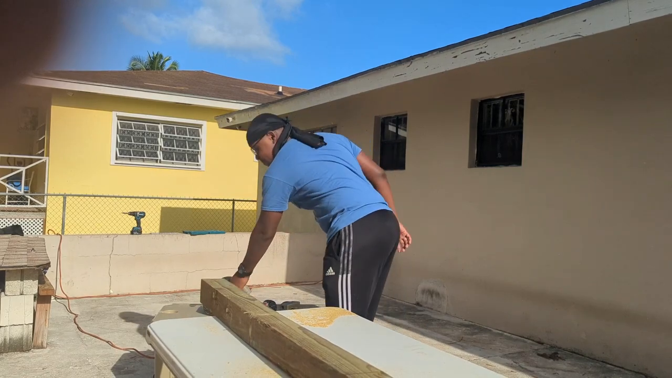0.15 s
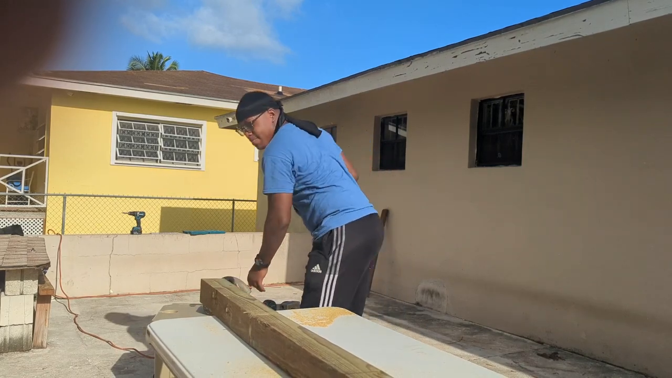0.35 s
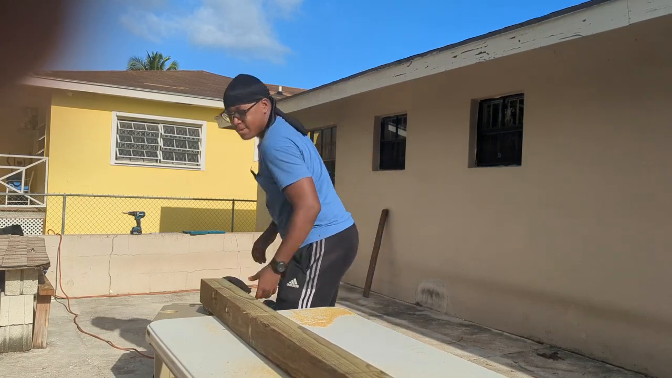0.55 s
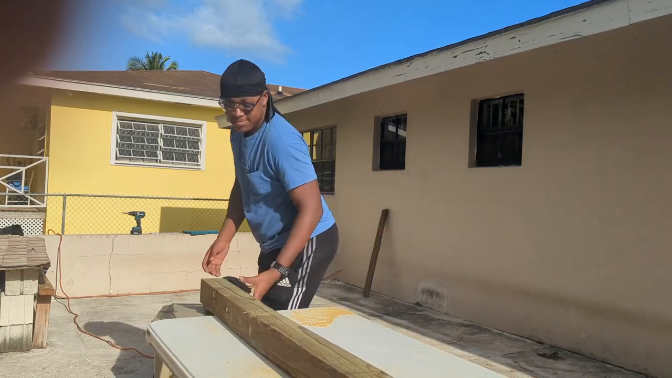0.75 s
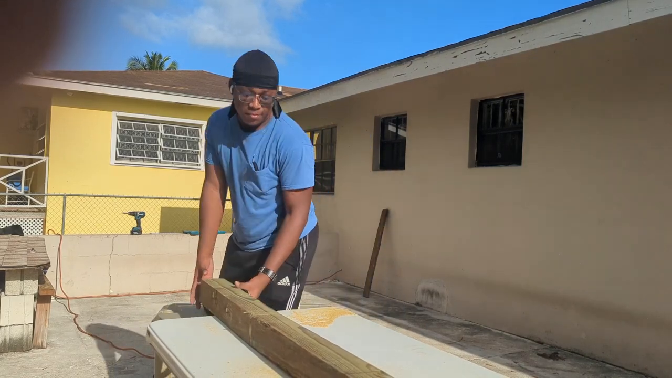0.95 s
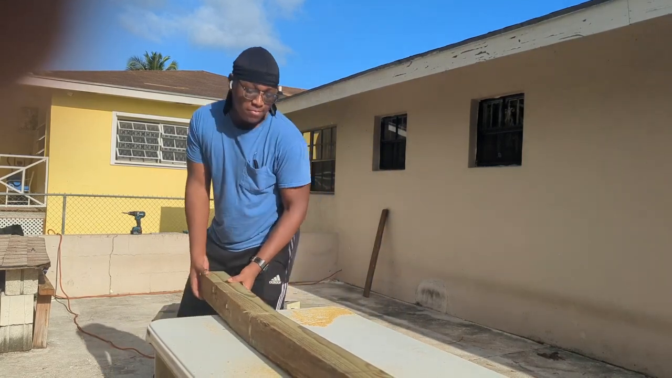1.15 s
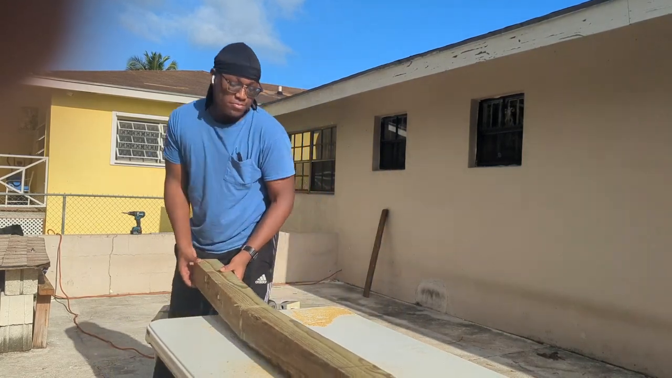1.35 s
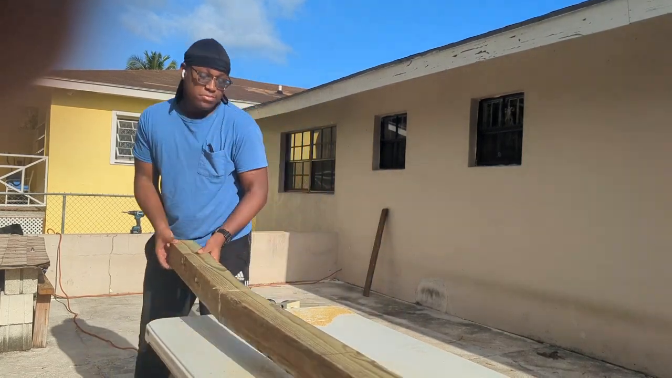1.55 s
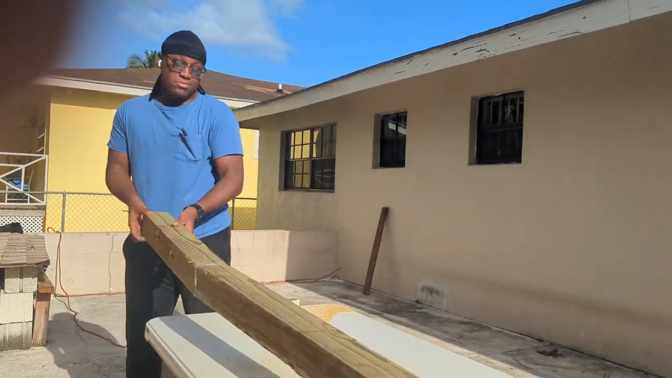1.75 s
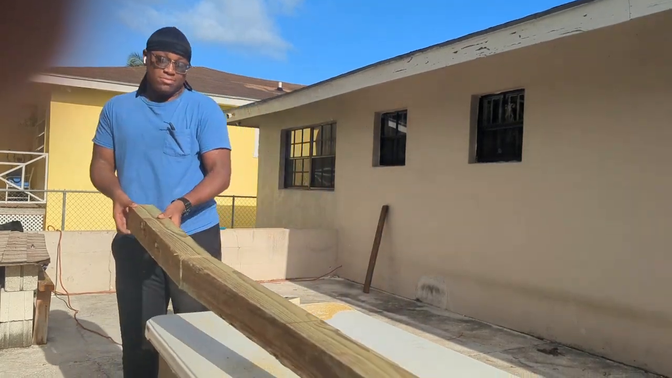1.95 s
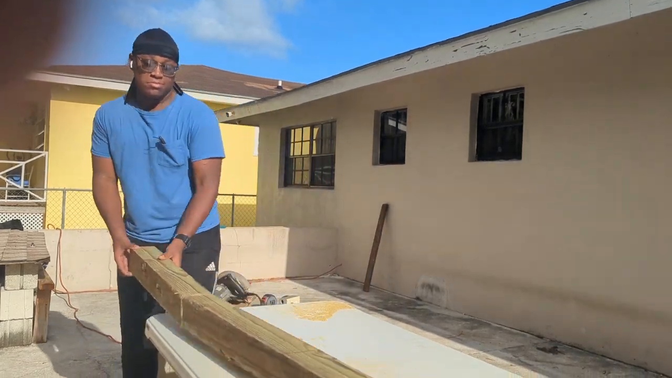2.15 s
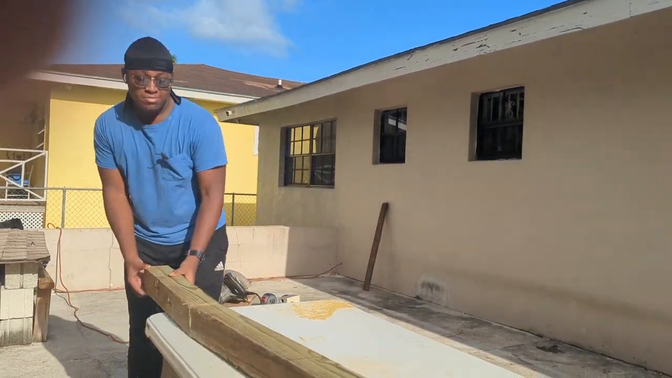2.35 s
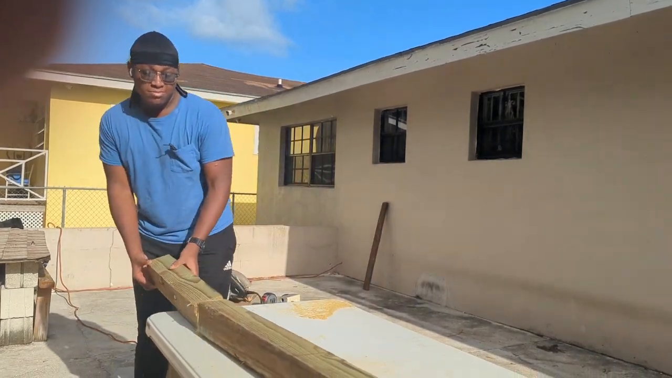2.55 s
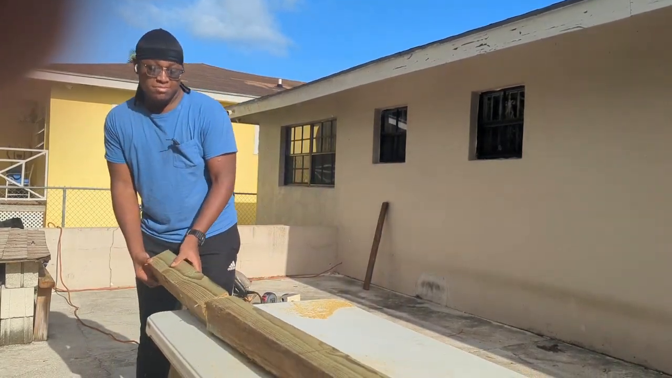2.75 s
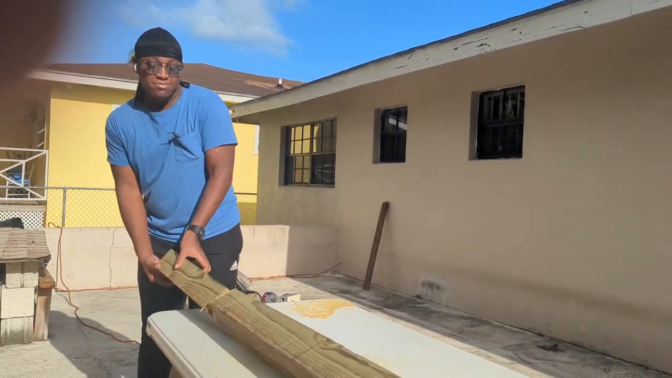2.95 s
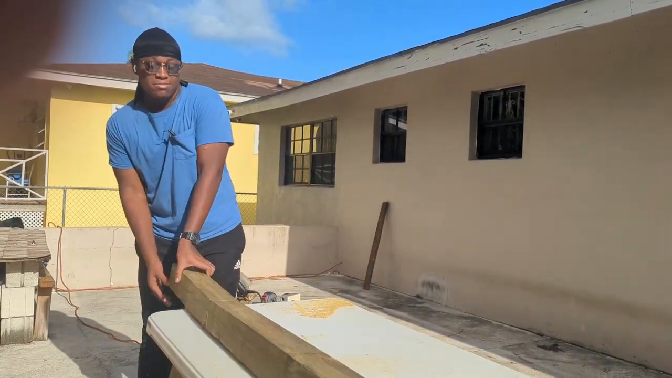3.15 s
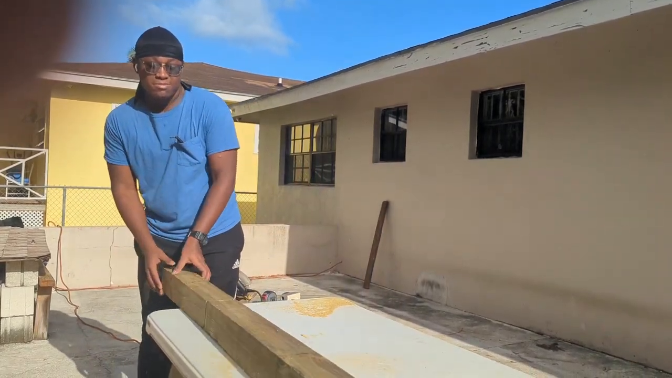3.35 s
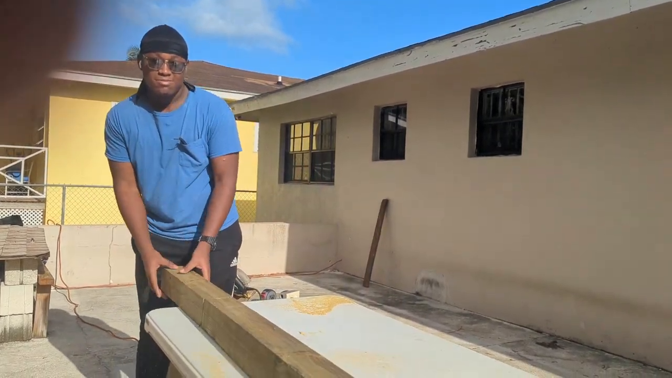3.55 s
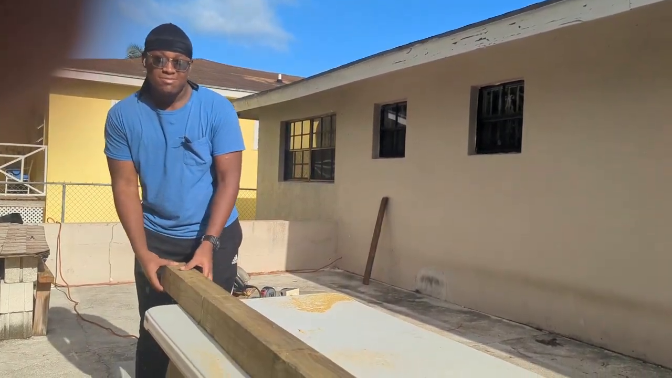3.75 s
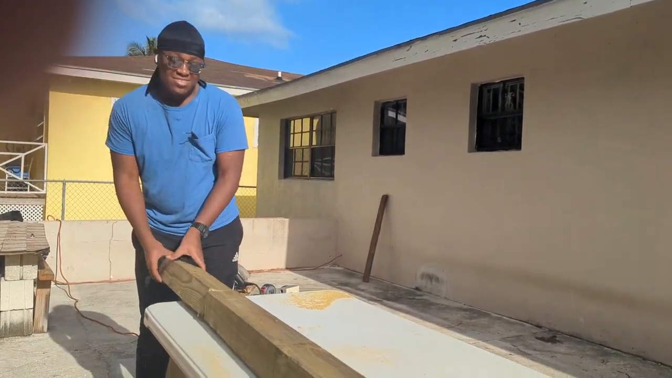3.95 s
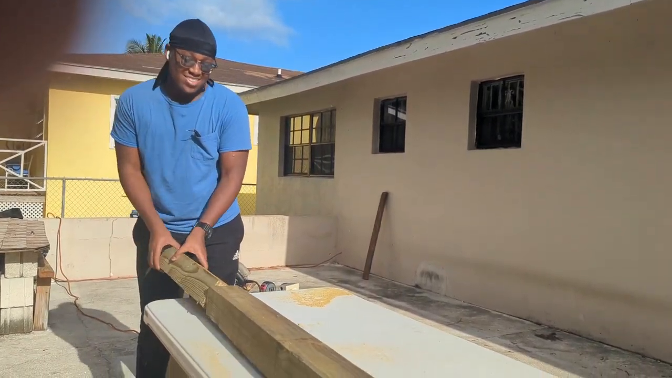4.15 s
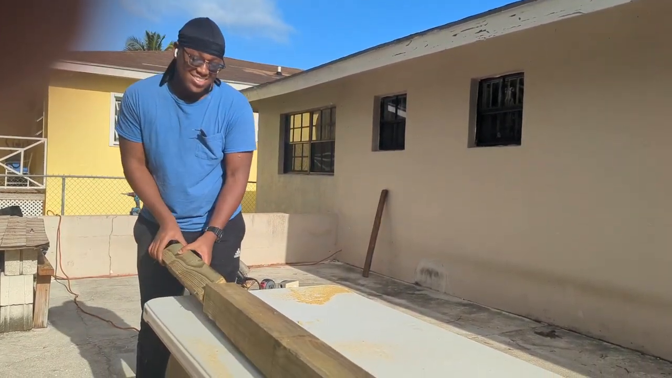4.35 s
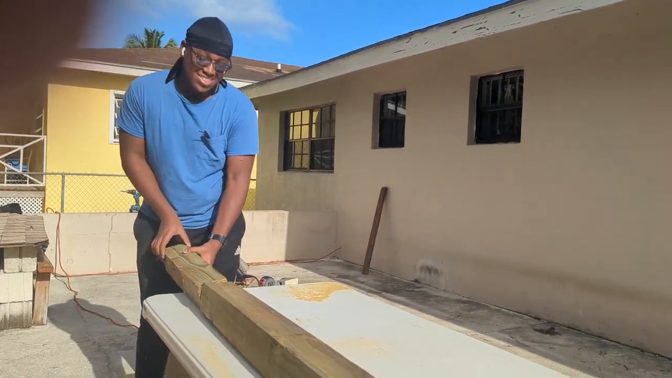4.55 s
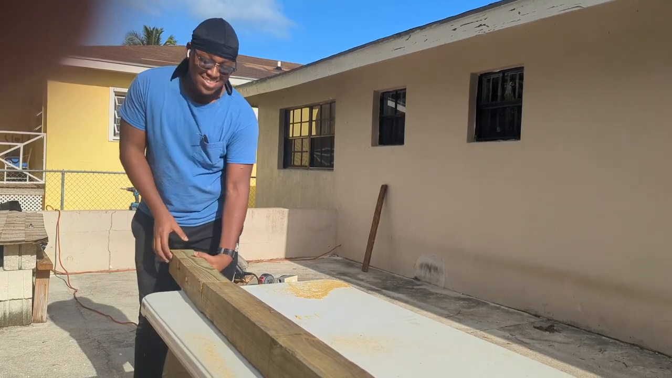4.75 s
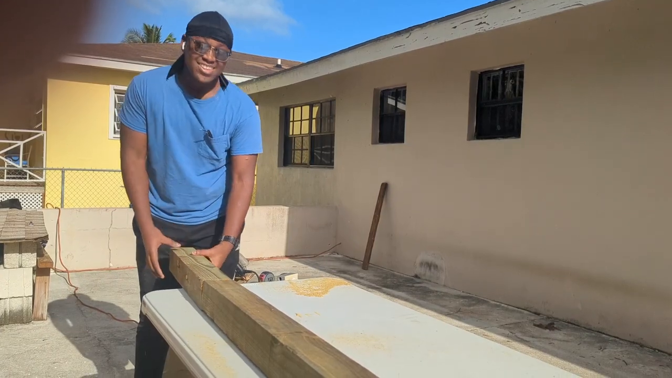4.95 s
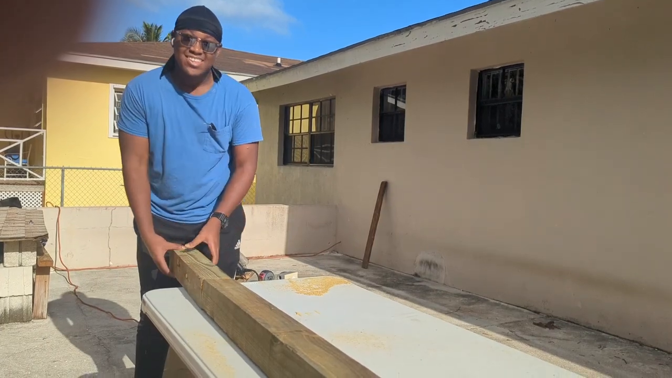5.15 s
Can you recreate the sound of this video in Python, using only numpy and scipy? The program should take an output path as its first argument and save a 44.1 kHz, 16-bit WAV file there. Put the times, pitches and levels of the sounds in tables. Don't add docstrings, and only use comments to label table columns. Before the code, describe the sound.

Outdoors, a thick beam is rolled and dropped on a hollow table, with light hand rubs and knocks between and one very hard bang.

```python
import sys
import numpy as np
from scipy import signal
from scipy.fft import rfft, irfft, next_fast_len
from scipy.io import wavfile
from scipy.ndimage import uniform_filter1d, map_coordinates

SR = 44100
rng = np.random.default_rng(int(sys.argv[2]) if len(sys.argv) > 2 else 0)


def persist_wave(psi):
    counts = np.round(np.clip(psi, -1, 1) * 32767).astype(np.int16)
    wavfile.write(sys.argv[1], SR, np.atleast_2d(counts).T)


def ratio(d):
    e = np.asarray(d, float) / 20
    return 10 ** e


N = 233405
RATTLE_DB, FLAT_DULLS = -16, 0.1


def unit(x):
    return x / np.sqrt(np.mean(x ** 2) + 1e-20)


def along(points, hz):
    f, v = np.transpose(points)
    return np.interp(np.log(hz + 1), np.log(f + 1), v)


def curves(rows, outside_db=None):
    s, *cols = np.transpose(rows)
    return np.array([np.interp(np.arange(N) / SR, s, c, outside_db, outside_db) for c in cols])


def wobble(rate):
    knots = rng.standard_normal(int(N * rate / SR) + 4)
    return map_coordinates(knots, [np.arange(N) * rate / SR])


def filtered(x, response):
    m = next_fast_len(N + SR // 2)
    return irfft(rfft(x, m) * response(np.fft.rfftfreq(m, 1 / SR)), m)[..., :N]


def body(modes):
    def response(f):
        total = 0
        for k, (hz, width, db) in enumerate(modes):
            peak = 1j * f * width / (hz * hz - f * f + 1j * f * width)
            total = total + (-1) ** k * ratio(db) * peak
        return total
    return response


def patchy(x, depth_db, size):
    z = signal.stft(x, nperseg=256)[2]
    field = rng.standard_normal(z.shape[-2:])
    field = uniform_filter1d(field, size[0], 0)
    field = uniform_filter1d(field, size[1], 1)
    return signal.istft(z * ratio(depth_db * unit(field)), nperseg=256)[1][..., :N]


def town():
    # (frequency [Hz], level per Hz [dB])
    town_colour = [(20, 1), (50, 0.5), (70, -4), (140, -3.5), (250, -10.5), (400, -15.5), (550, -19.5),
                   (1000, -21.5), (2000, -27), (2800, -36), (4100, -37.5), (6000, -50.5), (11000, -56),
                   (15700, -67)]
    noise = patchy(rng.standard_normal((2, N)), 1.0, size=(3, 28))
    level_db = -51 + 0.1747 * np.arange(N) / SR
    hiss = unit(filtered(noise, lambda hz: ratio(along(town_colour, hz))))
    return ratio(level_db + 9.0 + 0.8 * wobble(3.38)) * hiss


def drone():
    # (pitch [Hz], width [Hz], level [dB])
    hum_bands = [(81, 10, -42), (118, 16, -49), (190, 34, -50)]
    # (time [s], level [dB])
    load = [(0, -38.5), (.6, -41), (1.2, -42), (1.5, -42), (1.83, -44), (2.06, -39), (2.17, -44.5),
            (2.4, -37.5), (2.98, -42), (3.25, -35), (3.75, -38.5), (3.9, -43.5), (4.49, -40), (4.67, -40),
            (4.94, -36), (5.29, -42.5)]

    def muffled(hz):
        return body(hum_bands)(hz) / (1 + (hz / 500) ** 2)

    hum = unit(filtered(rng.standard_normal(N), muffled))
    return ratio(curves(load)[0] - 1.5 + 0.58 * wobble(2.4)) * hum


def whine():
    # (pitch [Hz], level [dB])
    machine_tones = [(81.5, -43.5), (551, -79), (916, -67), (1282, -87), (1562, -69), (11633, -100.5),
                     (12000, -97)]
    t = np.arange(N) / SR
    out = np.zeros(N)
    for hz, db in machine_tones:
        strength = ratio(db + 1.6 * wobble(1.49))
        out += strength * np.sin(2 * np.pi * hz * t + 0.46 * wobble(1.99))
    return out


def chatter_db():
    # (time [s], force [dB])
    drags = [
        [(0, -24), (.022, -37), (.06, -32), (.075, -32.5), (.09, -37)],
        [(.09, -37.5), (.112, -28.5), (.134, -32), (.168, -42), (.21, -54)],
        [(2.343, -33), (2.349, -30.5), (2.365, -35.5), (2.395, -36), (2.41, -32.5)],
        [(2.41, -34), (2.421, -28.5), (2.431, -27), (2.453, -32.5), (2.53, -66), (2.55, -69)],
        [(3.289, -22.5), (3.302, -19.5), (3.345, -14), (3.374, -22), (3.414, -23), (3.452, -25.5),
         (3.462, -24.5), (3.525, -29), (3.56, -41)],
        [(3.56, -44.5), (3.592, -37.5), (3.612, -40.5), (3.63, -70), (3.65, -74)],
    ]
    # (table top [dB], legs [dB])
    shares = [(6, -15.5), (5, -25), (8, -8.5), (3, -4), (3, -8.5), (2, -6.5)]
    grows = np.array([[1], [1], [1.08]])
    firm_db = -23
    each = []
    for rows, (top_db, legs_db) in zip(drags, shares):
        force_db = curves(rows, outside_db=-400)
        each.append(firm_db + grows * (force_db - firm_db) + [[top_db], [0], [legs_db]])
    return np.max(each, axis=0)


def chatter_slips():
    slipping = rng.random((3, N)) < 3000 / SR
    grains = slipping * rng.standard_normal((3, N)) * ratio(1.5 * rng.exponential(size=(3, N)))
    clumps_each = np.array([wobble(40), wobble(90), wobble(150)])
    grains *= ratio(1.7 * wobble(60) + 1.8 * clumps_each)
    return patchy(grains, 3.3, size=(2, 4))


def single_blows():
    # (time [s], wood peak [dB], flatness: table top over wood [dB])
    landings = [(0.003, -28.5, 24), (0.031, -23, 13), (0.055, -30, 20), (0.083, -28, 2), (0.117, -20, -9),
                (2.342, -26, -9), (2.347, -15.5, 10), (2.359, -25, -10), (2.428, -13, -8),
                (2.449, -15.5, -4), (3.29, -8, 2), (3.299, -3, -5), (3.31, 2.5, -20), (3.32, -8, -16),
                (3.333, -15, -18), (3.346, -9, -11), (3.389, -9, -31), (3.415, -15, -6), (3.436, -12, -11),
                (3.458, -8.5, -23), (3.489, -18.5, -3), (3.513, -24, 4), (3.589, -40, -45),
                (3.619, -48, -10)]
    out, t = np.zeros((3, N + 600)), np.arange(600) / SR
    t60 = [[.008], [.025], [.03]]  # top, wood, legs [s]
    shape = ratio(-60 * t / t60) * (1 - np.exp(-t / 0.0031))
    shape_size = np.linalg.norm(shape, axis=1)[:, None]
    for s, db, top_db in landings:
        grit = rng.standard_normal((3, 600))
        grit[0] = -0.079
        legs_db = RATTLE_DB - FLAT_DULLS * top_db - 6.5
        level = ratio(db + np.array([[top_db - 10.0], [-5], [legs_db]]))
        out[:, round(s * SR):][:, :600] += level * grit * shape / shape_size
    return out[:, :N]


def drops():
    # (pitch [Hz], width [Hz], level [dB])
    top_modes = [(48.6, 8.1, -7), (73, 40.4, -6), (129.2, 45, -4), (161.6, 52.4, -3), (197.4, 59.5, -3),
                 (280, 71, -13.5)]
    post_modes = [(284, 17.8, 3), (421, 90, -2.5), (616, 202, -3), (729, 200, -2), (870, 123, -3.5),
                  (1098, 360, -8), (1410, 125, -5.5), (1472, 108, -4), (1816, 157, -8.5), (2000, 110, -4),
                  (2430, 1300, -13.5)]
    leg_modes = [(2990, 940, -7.5), (3485, 300, 5), (3610, 360, 6), (4050, 750, -1), (5150, 980, -7.5),
                 (6840, 510, -11), (7780, 740, -13), (10800, 1400, -18.5), (12700, 1000, -21)]
    parts = (top_modes, post_modes, leg_modes)
    dull_hz = (5000, 5000, 14000)
    out = 0
    for modes, top_hz, strength, slip, blow in zip(parts, dull_hz, ratio(chatter_db()), chatter_slips(), single_blows()):
        ring = irfft(body(modes)(np.fft.rfftfreq(SR // 2, 1 / SR)))
        chatter = ratio(-3.5) * strength * unit(slip) / np.linalg.norm(ring)
        push = chatter + blow / np.abs(ring).max()
        out = out + filtered(push, lambda f: body(modes)(f) / (1 + 1j * f / top_hz) ** 2)
    return out


def rings():
    hollow_hz = [82, 118, 155, 694, 1110, 1405, 1570, 1880]
    brace_hz = [3265, 3620, 3840, 4005, 4200, 5260, 6540, 7980, 8700, 10780]
    # (t60 [s], knocks as (time [s], peak [dB]))
    hollows = [(0.18, [(0, -13.5), (2.41, -22), (3.49, -23)]), (0.15, [(3.299, -5), (3.405, -16)]),
               (.22, [(0, -18.5), (.045, -34), (.08, -18.5), (3.35, -19)]), (0.11, [(.125, -31.5),
               (2.628, -28), (3.312, -11.5)]), (0.049, [(.112, -33), (3.3, -12)]), (0.13, [(2.604, -34)]),
               (0.043, [(2.427, -16.5), (3.458, -20)]), (0.044, [(.055, -28), (2.604, -46)])]
    # (t60 [s], knocks as (time [s], peak [dB]))
    braces = [(0.4, [(3.53, -44), (3.6, -54.5), (3.66, -62)]), (.1, [(3.308, -21), (3.575, -41)]),
              (0.079, [(3.385, -28), (3.458, -27)]), (0.06, [(0, -32.5), (2.428, -21.5), (3.314, -14.5),
              (3.332, -33)]), (0.13, [(2.416, -30.5), (3.48, -30), (3.51, -34.5)]), (0.061, [(2.429, -28),
              (3.33, -18.5), (3.47, -36)]), (0.063, [(2.416, -48), (3.585, -50)]), (0.045, [(2.416, -38),
              (3.505, -51)]), (0.18, [(3.515, -48.5)]), (.2, [(3.5, -49)])]
    parts = [(hz, .0018, *part) for hz, part in zip(hollow_hz, hollows)]
    parts += [(hz, .0013, *part) for hz, part in zip(brace_hz, braces)]
    out, t = np.zeros(N + SR), np.arange(SR // 4) / SR
    for hz, roughness, t60, knocks in parts:
        rough = roughness * min(1, .1 / t60) ** .5
        flutter = 1 - 0.3 * np.sin(np.pi * hz / 70 * t) ** 2
        for s, db in knocks:
            walk = np.cumsum(rng.standard_normal(len(t)))
            tone = np.sin(2 * np.pi * hz * t + rough * np.sqrt(hz) * walk)
            fade = ratio(db - 60 * t / t60) * (1 - np.exp(-t / 0.0016))
            out[round(s * SR):][:len(t)] += fade * tone * flutter
    return out[:N]


def touches():
    # (time [s], peak [dB], pitch [Hz])
    knuckles = [(1.317, -45, 700), (2.043, -41, 750), (2.81, -45, 720), (0.67, -38.5, 1290),
                (0.766, -54, 280), (1.006, -60, 2000), (1.315, -37, 1640), (1.624, -40.5, 3170),
                (1.624, -47, 5400), (1.82, -45, 245), (2.002, -37, 3700), (2.35, -28, 600),
                (2.043, -30.5, 3550), (2.041, -36, 1900), (2.069, -40.5, 3830), (2.585, -31, 1830),
                (2.585, -33.5, 940), (2.606, -30.5, 1050), (2.604, -28.5, 1640), (2.626, -30, 1890),
                (4.765, -46, 343), (4.802, -30.5, 308), (4.805, -42, 614)]
    # (time [s], peak [dB], pitch [Hz])
    skin = [(.055, -61, 8000), (.118, -66, 7000), (.135, -60, 7000), (.705, -65, 7000), (0.847, -57, 6900),
            (1.473, -59, 6000), (1.495, -53, 9300), (1.515, -55, 7400), (1.55, -61, 6500),
            (1.622, -56, 6900), (1.915, -53.5, 8600), (1.93, -55, 6400), (2.004, -55, 8040),
            (2.038, -47.5, 7900), (2.057, -51, 9900), (2.067, -52, 7860), (2.105, -59, 9500),
            (2.226, -62, 6000), (2.280, -45.5, 7100), (2.297, -56, 7000), (2.349, -41, 9900),
            (2.407, -54, 8000), (2.585, -48.5, 5960), (2.631, -46.5, 4850), (3.007, -45, 9800),
            (5.283, -61, 7070)]
    out = []
    for s, db, hz in knuckles:
        t60 = 0.04 * (1000 / max(hz, 500)) ** 0.62
        out.append((s, db, hz, min(.8 * hz, 2400), t60, 4))
    for s, db, hz in skin:
        out.append((s, db, hz, 1.25 * hz, 0.035, 0))
    return out


def ticks():
    out, t = np.zeros(N + 6000), np.arange(6000) / SR
    f = np.fft.rfftfreq(6000, 1 / SR)
    for s, db, hz, width_hz, t60, click in touches():
        grit = rng.standard_normal(6000) * (1 - np.exp(-t / 0.0011))
        grit[0] = click
        narrow = body([(hz, width_hz, 0)])(f) ** (4 if click else 3)
        puff = irfft(rfft(grit * ratio(-60 * t / t60)) * narrow)
        out[round(s * SR):][:6000] += ratio(db + 1.5) * puff / np.abs(puff).max()
    return out[:N]


def rubbing():
    # (start [s], length [s], level [dB])
    hand_strokes = [(.15, 0.17, -71), (.5, 0.43, -68), (1.428, 0.71, -63), (1.84, 1, -64.5),
                    (2.595, .3, -66), (3.0, 0.026, -60), (3.104, 0.64, -60)]
    # (frequency [Hz], level per Hz [dB])
    skin_colour = [(1500, 5), (3000, 1), (4500, -1.5), (8000, -12.5), (15000, -60)]
    t = np.arange(N) / SR
    swell = np.zeros(N)
    for s, length, db in hand_strokes:
        swell += ratio(db) * np.sin(np.pi * np.clip((t - s) / length, 0, 1))
    hiss = unit(filtered(rng.standard_normal((2, N)), lambda hz: ratio(along(skin_colour, hz))))
    return swell * ratio(0.5 + 3.4 * wobble(29.5)) * hiss


def ports(common, other, alike, lead):
    # (frequency [Hz], left minus right [dB])
    port_tilt = [(1200, 0), (1750, .6), (2300, 3.5), (3700, 1.5), (4700, -3), (5800, -5.5), (8700, .5),
                 (15000, 1.5)]
    m = next_fast_len(N + 8192)
    hz, sign = np.fft.rfftfreq(m, 1 / SR), np.array([[1], [-1]])
    turn = np.arccos(np.clip(along(alike, hz), 0, 1)) / 2
    lag = np.exp(.5j * sign * np.interp(hz, *np.transpose(lead)))
    skew = ratio(sign * along(port_tilt, hz) / 2) * lag
    shared, own = np.cos(turn) * skew, sign * np.sin(turn) * skew
    level = np.hypot(np.abs(shared.mean(0)), np.abs(own.mean(0)))
    return irfft((rfft(common, m) * shared + rfft(other, m) * own) / level, m)[:, :N]


def background():
    # (frequency [Hz], likeness [0-1])
    alike_far = [(25, .65), (45, .99), (125, .9995), (300, .99), (800, .975), (1400, .9), (2500, .65),
                 (6000, .5), (11000, .15)]
    # (frequency [Hz], left leads [radians])
    lead_far = [(0, 0), (1900, -.4), (2760, -3.4), (4400, -4.5), (6900, -9.4), (12000, -13.5), (15400, -13)]
    wide = town() + rubbing()
    return ports(wide[0] + drone() + whine(), wide[1], alike_far, lead_far)


def echo(x):
    # (frequency [Hz], t60 [s])
    yard_decay = [(200, 0.2), (2000, 0.23), (10000, 0.12)]
    hz, t, z = signal.stft(rng.standard_normal(SR // 2), SR, nperseg=128)
    dying = z * ratio(-60 * t / along(yard_decay, hz)[:, None])
    tail = signal.istft(dying, SR, nperseg=128)[1]
    return signal.fftconvolve(x, tail / np.linalg.norm(tail))[:N]


def table():
    near = drops() + rings() + ticks()
    return near + ratio(-10.0) * echo(near)


def scene():
    # (frequency [Hz], likeness [0-1])
    alike_near = [(25, .55), (45, .98), (125, .9998), (300, .993), (800, .975), (1800, .96), (2600, .6),
                  (6000, .45), (11000, .25)]
    # (frequency [Hz], left leads [radians])
    lead_near = [(0, 0), (2000, -.2), (2700, -1.3), (6700, -1.8), (7300, -6.8), (9400, -9.3), (15000, -9)]
    return ports(table(), table(), alike_near, lead_near) + background()


def band_limit(x):
    return signal.sosfilt(signal.butter(12, 15810, fs=SR, output="sos"), x)


def record(dry):
    soft = dry / (1 + np.abs(dry / .85) ** 4) ** .25
    mix = filtered(soft, lambda hz: hz < 15810)
    return band_limit(mix)


dry = scene()
out = record(dry)
persist_wave(out)
```